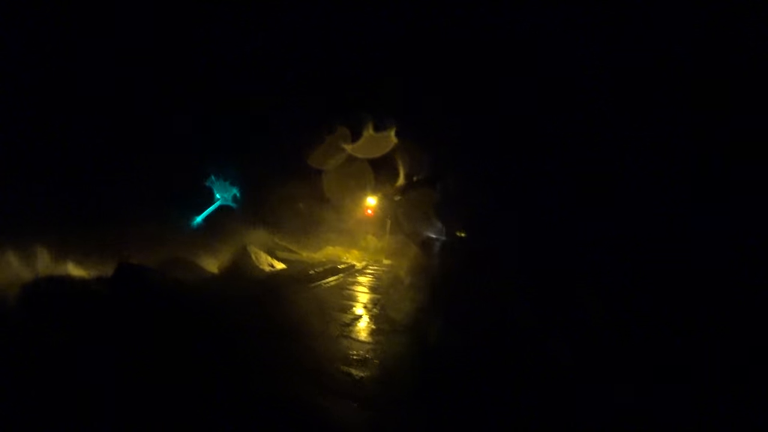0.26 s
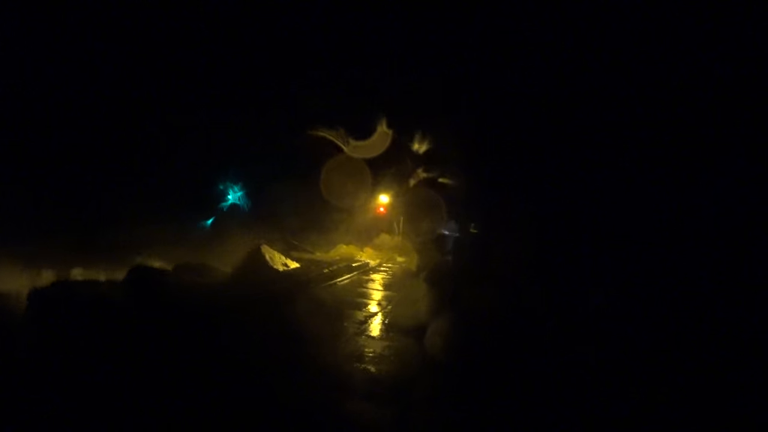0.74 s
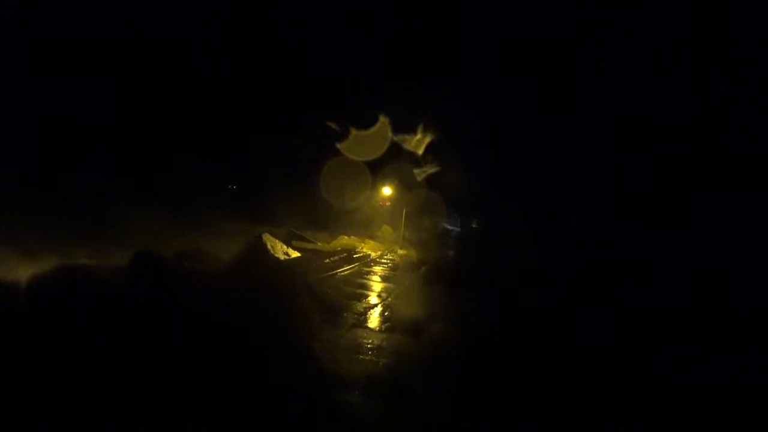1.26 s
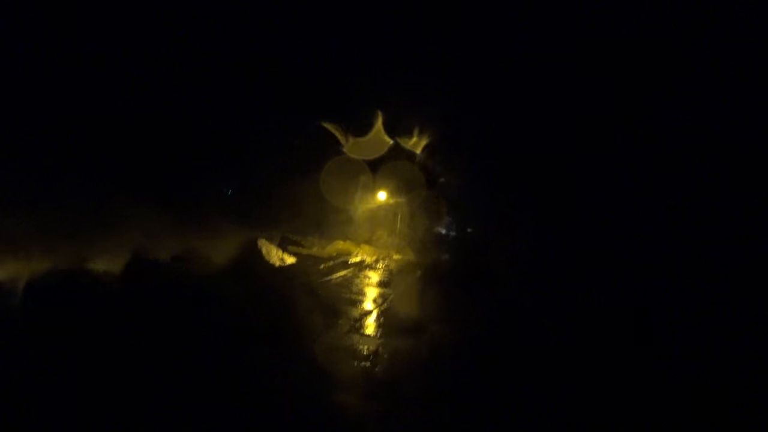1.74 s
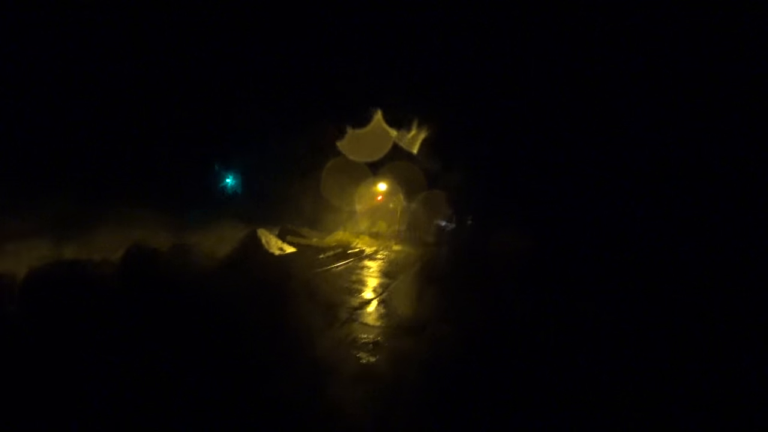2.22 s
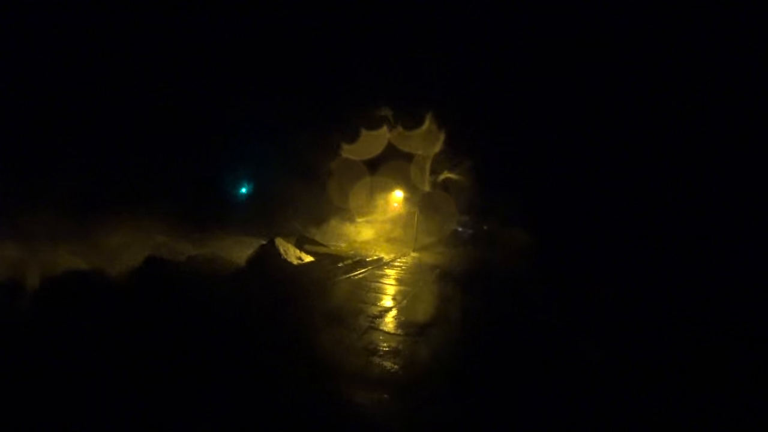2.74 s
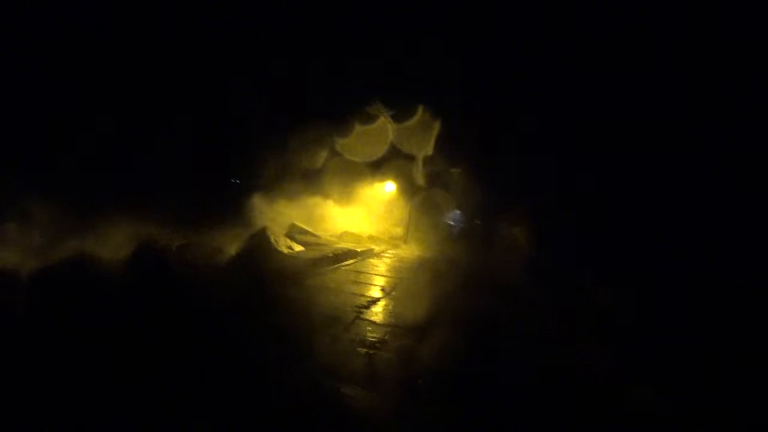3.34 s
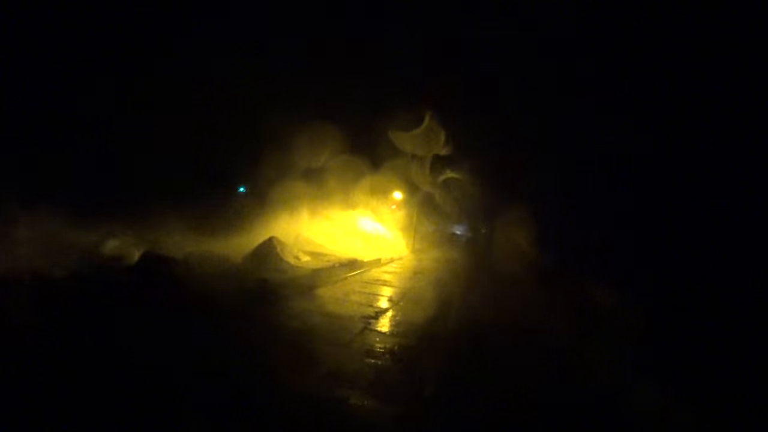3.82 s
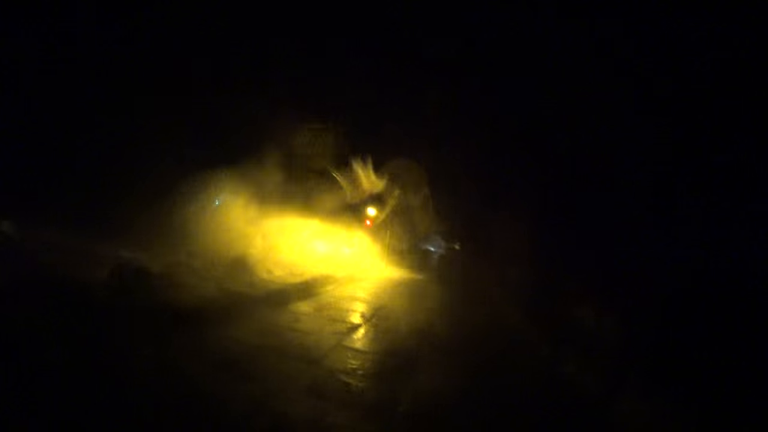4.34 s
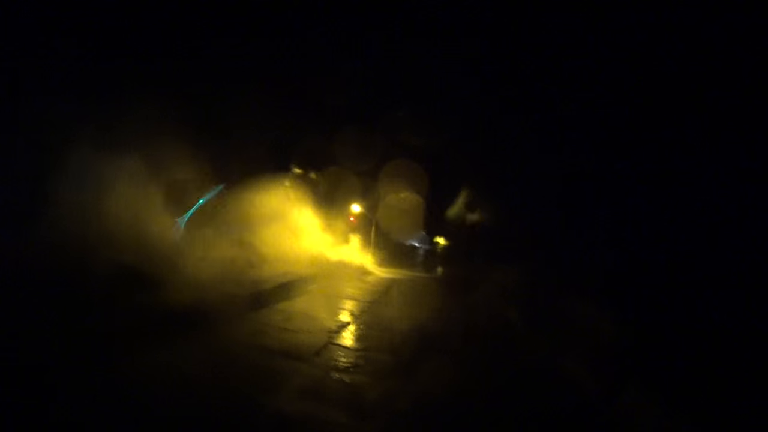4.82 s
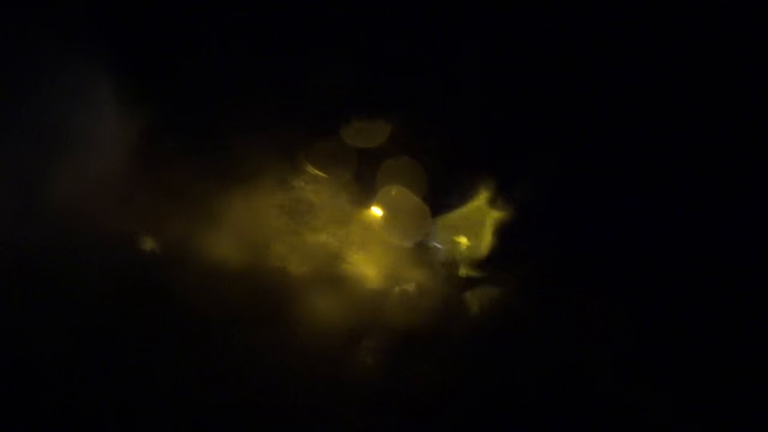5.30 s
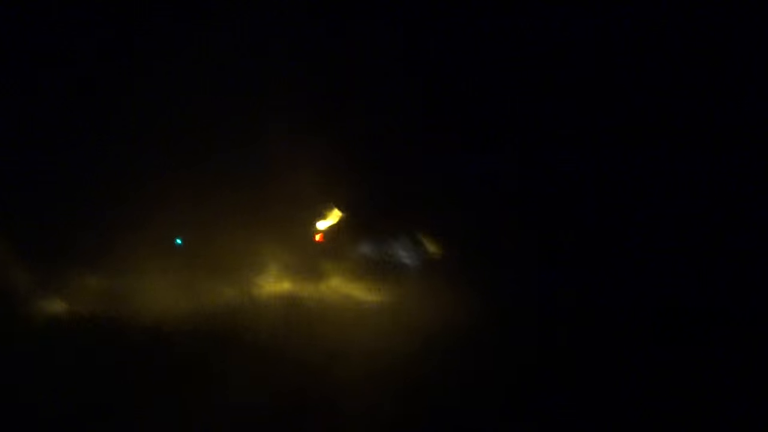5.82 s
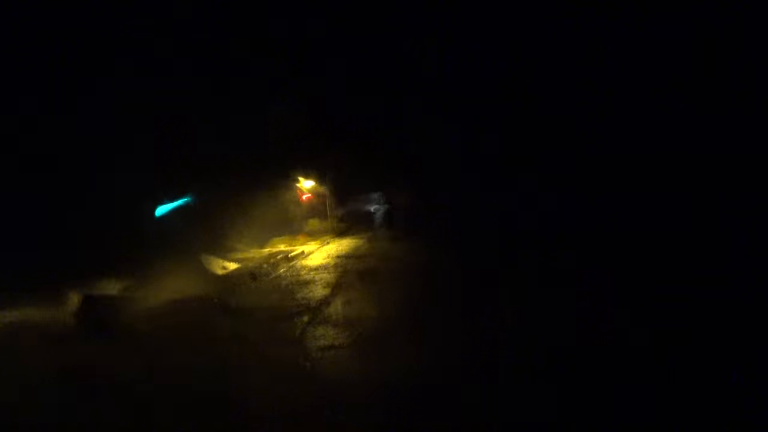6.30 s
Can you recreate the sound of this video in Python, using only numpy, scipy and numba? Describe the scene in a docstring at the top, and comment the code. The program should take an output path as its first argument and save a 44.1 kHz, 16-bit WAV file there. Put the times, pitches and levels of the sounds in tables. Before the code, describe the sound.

Very close, rough stereo storm sound: low wind rumble in uneven gusts, small hard taps of rain and bright ticks on the microphone body. After a few seconds a wave crashes on nearby rocks as a broad hiss, bringing mist patter and wet slaps. Water stuck in the microphone opening gurgles and pops ever louder, briefly pushing everything else down, then thins to scattered spits and drops.

```python
"""The roar of a gale on a harbour pier comes first: shaped noise, buffeting a wet handheld microphone.
An edge tone whistles at its port, and water lodged there sputters as damped rings and a spitting rasp.
Rain and spray ring the case and the mesh in short knocks and ticks; heavier splashes slap the port.
Behind them a wave bursts on the rocks as banded hiss, and fine mist drifts over as haze and patter.
A limiter ducks the whole mix for a moment around its hardest peaks."""
import sys
import numpy as np
from scipy import signal
from scipy.fft import rfft, irfft
from scipy.io import wavfile
from scipy.ndimage import uniform_filter1d, minimum_filter1d
from numba import njit

SR = 44100
rng = np.random.default_rng(int(sys.argv[2]) if len(sys.argv) > 2 else 0)


def inscribe(sig):
    """Save sig as 16-bit PCM at rate SR to the path in sys.argv[1].

    A 1-D sig is mono; a 2-D sig holds one channel per row.
    Samples are clipped to [-1, 1] before scaling.
    """
    pcm = np.round(np.clip(np.atleast_2d(sig).T, -1, 1) * 32767)
    wavfile.write(sys.argv[1], SR, pcm.astype(np.int16))


N = 288855

# Levels in the tables are taken before each source's own trim.
# changing level of the gale under the gusts: t/s, level/dB
GALE = [(0, -31.5), (.42, -32), (.65, -37), (1.3, -36), (1.5, -34), (1.85, -31), (2.3, -30.5), (2.85, -31),
        (3.3, -37.5), (3.6, -29), (3.9, -38), (4.1, -34.5), (4.45, -38.5), (4.9, -39), (5.3, -33.5),
        (5.55, -32.5), (5.75, -47), (6.55, -38.5)]
# gusts striking the microphone: start t/s, length/s, level/dB
GUSTS = [(0.0, 0.36, -32), (.18, 0.045, -26), (.515, 0.037, -33), (1.135, 0.065, -33.5),
         (1.28, 0.032, -34.5), (1.72, 0.027, -34.5), (1.905, .2, -28), (2.175, 0.045, -31),
         (2.345, 0.038, -28), (2.435, 0.079, -26.5), (2.56, 0.079, -27.5), (2.77, 0.12, -32),
         (2.95, 0.21, -35.5), (3.49, 0.21, -29), (3.755, 0.093, -26.5), (4.15, 0.086, -30.5),
         (4.555, 0.044, -36.5), (4.745, 0.034, -33), (4.965, 0.018, -36), (5.225, 0.043, -32),
         (5.37, 0.066, -31), (6.0, 0.053, -35), (6.175, 0.02, -34), (6.34, 0.11, -41)]
# gusts that cut across the rim of the port, whistling and rasping: start t/s, length/s, level/dB
CROSSWINDS = [(0.0, .03, -24.5), (.05, 0.12, -30.5), (1.91, 0.21, -33), (2.78, 0.054, -38)]
# spectrum of the roar: f/Hz, density level/dB per Hz
WIND_COLOUR = [(15, -43), (25, -12), (107, 0.5), (145, -4.5), (206, 0), (332, -1), (370, -1.5), (791, -7.5),
               (1070, -4.5), (1360, 2), (1520, -5.5), (1770, -4), (2290, -16.5), (2670, -25), (3040, -22.5),
               (4500, -26), (5850, -32.5), (9900, -120)]
# turbulence that differs between the two ports: f/Hz, side minus mid level/dB
WIND_SIDE = [(60, -82), (200, -42.5), (380, -16), (650, 0.5), (950, -9.5), (1290, -17), (1800, -3),
             (2400, 12.5), (4400, 0)]
# the wind's lean: f/Hz, left minus right level/dB
WIND_LEAN = [(400, 0), (800, .7), (1300, 2.4), (1900, 2.6), (2800, -3)]
# resonances of the wet port: f/Hz, width/Hz, level/dB, phase between the ports/rad
PORT = [(1670, 214, -1, 0.48), (1386, 125, -14.5, 0.5), (980, 200, -38.5, -0.5), (2804, 720, -11.5, 5.5),
        (3623, 240, -15, 4.5)]
# the long gust blows the port nearly dry until the wave's spray refills it: t/s, wetness/0-1
WETNESS = [(0, .6), (1.3, .9), (1.9, .5), (2.2, .15), (3.3, .15), (3.55, 1), (6.55, 1)]
# bursts of air through the water in the port: start t/s, length/s, level/dB
BURSTS = [(.18, 0.029, -23.5), (.92, 0.044, -28), (.95, .015, -31), (.995, 0.055, -26.5),
          (1.14, 0.023, -27), (2.44, 0.057, -29), (2.605, 0.071, -25.5), (2.69, 0.055, -31.5),
          (2.77, 0.093, -30), (3.57, 0.22, -27.5), (3.74, .07, -35), (3.815, .015, -16.5),
          (4.19, 0.066, -28), (4.355, 0.086, -26), (4.488, 0.024, -25.5), (4.758, 0.023, -20.5),
          (4.965, 0.018, -26.5), (5.505, 0.02, -27), (5.538, 0.13, -12.5), (5.665, 0.056, -6.5),
          (5.799, 0.024, -15.5), (5.852, 0.055, -24), (5.915, .033, -19), (5.972, .12, -21.5),
          (6.0, 0.047, -14.5), (6.125, 0.036, -19.5), (6.177, 0.031, -14), (6.338, 0.08, -26)]
# single loud pops of that water: t/s, peak level/dB, main ring f/Hz
POPS = [(0.08, -12, 1530), (0.088, -10, 1690), (.19, -10, 1660), (0.2147, -10, 1740), (.591, -16, 1830),
        (0.9245, -8.5, 1700), (1.014, -9.5, 1650), (1.9158, -9, 1690), (3.5335, -17, 1640),
        (3.638, -7, 1670), (3.6644, -12, 1750), (3.7088, -5, 1720), (3.749, -2.5, 1670),
        (3.7807, -12, 1620), (3.8177, -9, 1540), (3.9318, -10.5, 1730), (4.0917, -13, 1850),
        (4.118, -12.5, 1640), (4.214, -14, 1590), (4.278, -14, 1730), (4.285, -3, 1690),
        (4.3455, -16, 1700), (4.3593, -9, 1730), (4.4, -9, 1670), (4.4892, -1, 1630), (4.4936, 3, 1770),
        (4.52, -9.5, 1660), (4.5523, -10, 1660), (4.6861, -10.5, 1620), (4.7604, -9.5, 1910),
        (5.03, -11.5, 1610), (5.0601, 7, 1750), (5.1818, -13.5, 2100), (5.296, 2, 1700),
        (5.4824, 5.5, 1700), (5.505, -7.5, 1360), (5.511, 1, 1730), (5.536, 2.5, 1700), (5.541, 0, 1770),
        (5.5526, -1, 1730), (5.5898, 5.5, 1770), (5.5986, 2.5, 1780), (5.6372, 11.5, 1690),
        (5.6482, 8, 1720), (5.6743, 9.5, 1630), (5.697, 6, 1660), (5.721, -0.5, 1760), (5.73, 10, 1660),
        (5.8076, -4, 1650), (5.8503, -2, 1780), (5.8777, -6, 1600), (5.917, -5, 1680), (5.9284, -1, 1670),
        (5.9442, 3, 1660), (5.974, 6, 1700), (6.0257, 4.5, 1700), (6.0893, -17, 1700), (6.1277, -5, 1650),
        (6.1633, -8, 1690), (6.1765, 0, 1670), (6.1874, -6, 1470), (6.193, -1, 1300), (6.2049, 7.5, 1540),
        (6.337, -8, 1640)]
# hard drops tapping the case: t/s, peak level/dB, main ring f/Hz, side/+1 left, -1 right
DROPS = [(.1175, -0.5, 5200, 1), (.2692, -10.5, 4350, -1), (.3435, -12.5, 5030, 1), (.8048, 5, 4170, -1),
         (.9008, 3.5, 5230, 1), (1.087, 4, 4400, -1), (1.1823, 11.5, 4550, -1), (1.2132, -10, 5100, 1),
         (1.3062, 9, 3500, -1), (1.3382, -6.5, 5240, 1), (1.3664, 10, 5400, 1), (1.54, 2.5, 5020, 1),
         (1.6734, -11.5, 4960, 1), (1.7515, 9.5, 5230, 1), (1.8175, 1, 4830, 1), (1.8531, 7.5, 5570, 1),
         (1.9295, -14, 4530, 1), (2.4101, -9, 4930, 1), (2.5908, -1, 4650, 1), (2.6501, 4.5, 4070, -1),
         (2.9023, 4, 4770, 1), (2.9616, -14, 4730, 1), (2.9973, -13.5, 5100, 1), (3.2485, 0, 4940, 1),
         (3.2589, 1.5, 5040, 1), (3.4972, -6.5, 5430, 1), (3.64, -1.5, 3930, -1), (3.6753, 8, 5100, 1),
         (3.7786, -8, 3640, 1), (3.8334, 5, 3980, -1), (3.8429, 10, 3660, 1), (3.8839, 5, 4970, -1),
         (3.899, 5, 5000, 1), (3.9302, -5, 4440, -1), (3.949, -15, 4900, 1), (4.0497, -12.5, 4100, -1),
         (4.0915, -4.5, 3780, 1), (4.0983, 1, 5100, 1), (4.1821, -11.5, 4970, -1), (4.2327, 5.5, 4280, -1),
         (4.3933, -11, 4170, -1), (4.4223, 4, 5030, 1), (4.4402, 3, 4800, 1), (4.4704, 7, 5320, 1),
         (4.5115, -3, 4230, -1), (4.5246, -6, 4450, -1), (4.6161, -8, 4700, 1), (4.6944, 2, 5670, 1),
         (4.7943, -1, 3700, -1), (4.8498, -3, 4800, 1), (4.8913, 6.5, 4340, -1), (4.985, -13, 3910, -1),
         (5.039, -2, 3960, -1), (5.0639, 0, 5160, 1), (5.4819, 7, 5600, 1), (5.6554, 2.5, 5370, 1),
         (5.7589, -5, 5240, -1), (5.7754, -9, 5000, -1), (5.7925, -8.5, 4940, -1), (5.8181, -2.5, 4660, 1),
         (5.843, -13, 5200, 1), (5.881, -2, 4400, 1), (6.0539, 2, 4860, -1), (6.096, -2, 4940, 1),
         (6.1153, 9, 4330, -1), (6.1505, -6, 3850, 1), (6.4483, 10.5, 4340, 1), (6.4662, 2, 4050, -1)]
# ticks on the mesh, from droplets and from the mesh ring of soft drops: t/s, peak level/dB
TICKS = [(0.2032, 3.5), (0.2401, -9), (.3273, -16), (.3338, -11), (0.4894, -12), (0.6773, 0.5),
         (.7094, -12), (0.7237, -13), (1.0013, -13), (1.1208, -11), (1.156, -12), (1.2132, -9),
         (1.347, -15), (1.5493, -7), (1.574, -14), (1.91, -18), (1.9295, -24), (2.4101, -17), (2.4276, -24),
         (2.5265, -16), (2.6176, -18), (2.6357, -16), (2.6468, -19), (2.9973, -22), (3.1517, -15),
         (3.302, -13), (3.3667, -18), (3.3821, -12.5), (3.4869, -12), (3.5385, -13), (3.5918, -13),
         (3.6726, 1), (3.824, -10), (3.949, -20), (3.9843, -8), (3.9994, -12), (4.0451, -10), (4.1497, -10),
         (4.2222, -17), (4.273, -6), (4.2876, -9), (4.3456, -12), (4.4144, -12), (4.6944, 5), (4.8014, 5),
         (4.9614, 4.5), (5.004, -10), (5.26, -3), (5.6213, -2), (5.6469, 2.5), (5.8181, -1), (5.993, -12),
         (6.0144, -8), (6.064, -9), (6.3096, -10), (6.394, -13)]
# spray landing squarely on a port: t/s, peak level/dB
SPLASHES = [(3.844, 8), (4.309, 2.5), (5.656, -0.5), (5.697, 4.5), (5.8183, -2), (6.0451, -8.5),
            (6.098, -11), (6.1565, -4), (6.4485, 1)]
# airborne spray and surf: t/s, surf hiss level/dB, fine mist level/dB
SPRAY = [(0, -53, -55), (.8, -48, -54.5), (1.55, -49.5, -53.5), (2.05, -49.5, -52.5), (2.7, -41.5, -55.5),
         (3.35, -43.5, -50), (3.75, -37, -44), (3.89, -50, -52), (4.0, -41, -47.5), (4.3, -37.5, -44),
         (4.85, -38.5, -45.5), (5.35, -33.5, -38.5), (5.62, -31.5, -40.5), (5.75, -41.5, -56.5),
         (6.05, -30.5, -42.5), (6.27, -46, -54), (6.4, -37.5, -46), (6.55, -43.5, -53.5)]
# upper edge of the hiss, sliding as the microphone turns: t/s, f/Hz
SURF_EDGE = [(0, 6100), (1.8, 6200), (4.9, 5350), (5.3, 7260), (5.6, 6860), (5.9, 5070), (6.55, 4700)]
# spectrum of the surf: f/Hz, density level/dB per Hz
SURF_COLOUR = [(1500, 11), (2800, 8), (4200, 3.5), (5900, 6.5), (7000, -1), (10000, -17), (15000, -17)]
# spectrum of the mist: f/Hz, density level/dB per Hz
MIST_COLOUR = [(6500, -23), (8500, -0.5), (10300, -5.5), (12000, 1.5), (14300, -3), (15000, -4),
               (16000, -3.5)]

GUST_ATTACK_S, GUST_RELEASE_S = 0.024, 0.04
CROSSWIND_ATTACK_S, CROSSWIND_RELEASE_S = 0.02, 0.12
BURST_ATTACK_S, BURST_RELEASE_S = 0.0099, 0.018
RASP_DB, CROSSWIND_RASP_DB = -16, -7  # against the untrimmed gust level; against the crosswind level
SIMMER_DB = -2.5  # crackle of the wet port between bursts, against the untrimmed gust level
GUST_CARRY = 0.27  # dB more spray for each dB that a gust rises above the gale
DROP_PHASE_RAD = 1.81  # lead of the port nearer to the drop
TOP_HZ = 15950  # final low-pass edge
TIME = np.arange(N) / SR
FREQ = np.maximum(np.fft.rfftfreq(N, 1 / SR), 1)
LEFT_RIGHT = np.array([[1], [-1]])


def undb(db):
    """Decibels to gain."""
    return 10 ** (np.asarray(db) / 20)


def unit(x):
    """Scale to rms 1."""
    return x / np.sqrt(np.mean(x ** 2))


def curve(table, axis=1):
    """One column of a time table at every sample."""
    rows = np.array(table)
    return np.interp(TIME, rows[:, 0], rows[:, axis])


def swells(rows, attack_s, release_s):
    """Gain of overlapping (start, length, dB) events, each with an attack, a hold and a release."""
    power = 0
    for s, length, db in rows:
        corners = [s - attack_s, s, s + length, s + length + release_s]
        envelope = np.interp(TIME, corners, [0, undb(db), undb(db), 0])
        power = power + envelope ** 2
    return np.sqrt(power)


def response(points):
    """Gain at every frequency from (Hz, dB) points."""
    hz, db = np.transpose(points)
    return undb(np.interp(np.log(FREQ), np.log(np.maximum(hz, 1)), db))


def noise(gain):
    """Noise with the given gain at each frequency."""
    return irfft(rfft(rng.standard_normal(N)) * gain, N)


def walk(rate):
    """Smooth random drift of rms 1 that changes about rate times a second."""
    return unit(noise(1 / (1 + (FREQ / rate) ** 4)))


def stereo_noise(colour, side):
    """Coloured noise with a share that is opposite in the two channels."""
    return unit(noise(colour) + LEFT_RIGHT * noise(colour * side))


def ring(hz, width_hz, phase, rise_s=.0001, order=1):
    """A short damped resonance, softer in onset with higher order; the left port leads the right by phase."""
    t = TIME[:1024]
    decay = np.exp(-np.pi * width_hz * t) * (1 - np.exp(-t / rise_s)) ** order
    return decay / decay.max() * np.sin(2 * np.pi * hz * t + LEFT_RIGHT * phase / 2)


def add(out, s, sound):
    """Mix a short sound in at time s."""
    i = int(np.clip(s * SR, 0, N - 1))
    out[:, i:i + sound.shape[1]] += sound[:, :N - i]


def shower(per_s, spread_db, sound):
    """Random impacts of uneven size and either polarity, each ringing with the same sound."""
    hits = (rng.random(N) < per_s / SR) * rng.choice([-1, 1], N)
    sizes = undb(spread_db * np.clip(rng.standard_normal(N), -2, 2))
    return signal.oaconvolve((hits * sizes)[None], sound, axes=1)[:, :N]


def wind(gust_db, crosswind, level_db=4, eddy_db=1.75, flutter_db=1.4):
    """Eddies buffet the ports with a roar; the finest add a rasp above it, most of all in a crosswind."""
    roar = stereo_noise(response(WIND_COLOUR), response(WIND_SIDE))
    roar = irfft(rfft(roar) * response(WIND_LEAN) ** (LEFT_RIGHT / 2), N)
    buffet_db = eddy_db * walk(37.0) + flutter_db * walk(170)
    fine_colour = response([(900, -40), (2000, 3), (2700, 13.5), (4000, -10), (7000, -17.5), (12000, -47)])
    fine = stereo_noise(fine_colour, 1.0)
    rasp = np.hypot(undb(gust_db + RASP_DB), crosswind * undb(CROSSWIND_RASP_DB))
    return (roar * undb(gust_db + level_db) + fine * rasp) * undb(buffet_db)


def whistle(gust_db, crosswind, hz=1792, width_hz=30, side=0.46, faint_db=-14):
    """A narrow, unsteady edge tone at the port, faint until the wind cuts across the rim."""
    tone = stereo_noise(1 / (1 + ((FREQ - hz) / width_hz) ** 2), side)
    return tone * (crosswind + undb(gust_db + faint_db))


def port_ring(stretch):
    """The wet port's modes, all shifted by the amount of water in it."""
    return sum(undb(db) * ring(hz * stretch, width, phase, rise_s=0.00059) for hz, width, db, phase in PORT)


def sputter(gust_db, level_db=-2, pop_db=-1, spit_db=-12):
    """Air breaks through the water in the port: a dense crackle, single loud pops and a spitting rasp."""
    crackle = sum(shower(150, 4.9, port_ring(stretch)) for stretch in (.93, 1, 1.06))
    # dry wind alone does not make the port crackle
    simmer = np.sqrt(curve(WETNESS)) * undb(gust_db + SIMMER_DB)
    airflow = np.hypot(simmer, swells(BURSTS, BURST_ATTACK_S, BURST_RELEASE_S))
    out = unit(crackle * undb(1.14 * walk(58))) * airflow * undb(level_db)
    # the crackle tears the film into hissing droplets, so the spit follows its envelope
    envelope = np.sqrt(uniform_filter1d(np.mean(out ** 2, axis=0), size=90) + 1e-12)
    spit_colour = response([(700, -33), (2000, 11.0), (3000, 6), (3800, 4), (5200, 1.5), (7000, -7), (16000, -4.5)])
    spit = stereo_noise(spit_colour, 0.61)
    tearing_db = 4 * walk(250)
    out = out + spit * envelope * undb(spit_db + tearing_db)
    for s, db, hz in POPS:
        add(out, s, undb(db + pop_db) * port_ring(hz / PORT[0][0]))
    # the wet port lies a little to the left
    return out * undb(LEFT_RIGHT * .7)


def case_ring(hz, phase, chance, second_db=-10, tail_db=-20, overtone_db=-18):
    """A drop's knock on the case: main mode, a neighbour of random pitch, a faint tail and an overtone."""
    main = ring(hz, 2050, phase, rise_s=0.00038, order=2)
    second = ring(hz * (1.12 + .14 * chance[0]), 1000, phase, rise_s=0.00076, order=2)
    tail = ring(4000 * (1 + 0.045 * chance[1]), 400, phase, rise_s=0.00069, order=2)
    overtone = ring(9870, 1800, phase / 2, rise_s=.0001, order=2)
    knock = main + undb(second_db) * second
    return knock + undb(tail_db + 1.6 * chance[2]) * tail + undb(overtone_db) * overtone


def mesh_ring(stretch, case_db=-19, lower_db=-3):
    """The bright, very short ring of the mesh, with a little of the case."""
    mesh = ring(13800 * stretch, 1700, .5, rise_s=.0002, order=2)
    lower = ring(12200 * stretch, 1400, -.6, rise_s=.00025, order=2)
    case = ring(4600 * stretch, 1400, 1.0, rise_s=0.00068, order=2)
    # the lower mode swings against the upper one, which fills the band between them
    return mesh - undb(lower_db) * lower + undb(case_db) * case


def rain(drop_db=0, tick_db=-3.0, mesh_db=-15, mesh_growth=0.83, crack_db=-12):
    """Single knocks on the case and ticks on the mesh; a harder drop adds more knock than mesh ring."""
    out = np.zeros((2, N))
    for (s, db, hz, side), chance in zip(DROPS, rng.standard_normal((len(DROPS), 4))):
        mesh = mesh_ring(1.025 + .02 * chance[3])
        knock = case_ring(hz, np.sign(side) * DROP_PHASE_RAD, chance)
        add(out, s, undb(db + drop_db) * knock + undb(mesh_db + mesh_growth * db) * mesh)
    for (s, db), chance in zip(TICKS, rng.standard_normal((len(TICKS), 3))):
        mesh = mesh_ring(1.025 + .02 * chance[0])
        crack = undb(crack_db + 4 * chance[1]) * ring(9500, 4500, .6, rise_s=.00004)
        lean_db = 2.5 * chance[2] * LEFT_RIGHT
        add(out, s, undb(db + tick_db + lean_db) * (mesh + crack))
    return out


def splashes(level_db=0, skew_db=-1, thump_db=-3):
    """Water slaps a port: the left side is pushed and the right one pulled, and the case thumps low."""
    slap = LEFT_RIGHT * (ring(620, 910, 0) * 0.4 + ring(1700, 1100, 0) * 2.66) * undb(skew_db)
    thump = ring(390, 510, 0, rise_s=0.00034) * undb(thump_db)
    # the port leaks, so no pressure stays
    leak = signal.butter(2, 90, "high", fs=SR, output="sos")
    sound = signal.sosfilt(leak, slap + thump)
    out = np.zeros((2, N))
    for s, db in SPLASHES:
        add(out, s, undb(db + level_db) * sound)
    return out


def surf(carried_db, level_db=2, above_edge_db=-11, steepness=14):
    """Broken water hisses on the rocks in bands that churn separately, weaker above a moving edge."""
    edge, colour, out = curve(SURF_EDGE), response(SURF_COLOUR), 0
    borders = np.geomspace(1200, 16000, 19)
    for low, high in zip(borders[:-1], borders[1:]):
        band = colour * (FREQ >= low) * (FREQ < high)
        passed = 1 / (1 + (np.sqrt(low * high) / edge) ** (2 * steepness))
        gain = np.sqrt(passed + undb(above_edge_db) ** 2)
        churn = undb(.9 * walk(15))
        out = out + gain * churn * np.array([noise(band), noise(band)])
    surge_db = .9 * walk(30)
    return unit(out) * undb(curve(SPRAY) + carried_db + level_db + surge_db)


def spray(carried_db, mist_db=0, patter_db=-45.5, patter_growth=0.23, dry_db=-4, case_db=-48):
    """The surf's mist blows over as a smooth haze and a patter of droplets, fainter on a dry mesh."""
    mist = curve(SPRAY, axis=2) + carried_db
    haze_colour = response(MIST_COLOUR) * np.minimum(FREQ / 6500, 1)
    haze = stereo_noise(haze_colour, 0.46) * undb(mist + mist_db + 2 * walk(87))
    thickness_db = mist - np.mean(mist)
    per_s = 50 * undb(thickness_db) ** .9  # droplets in each shower
    flurry = undb(3 * walk(18))
    patter = unit(flurry * sum(shower(per_s, 5.5, mesh_ring(stretch)) for stretch in (1, 1.02, 1.04)))
    patter_gain = undb(patter_db + patter_growth * thickness_db + dry_db * (1 - curve(WETNESS)))
    # fine taps on the case, one shower to each side
    taps = unit(sum(shower(per_s, 6, ring(hz, 1600, phase, rise_s=.0003, order=2))
                    for hz, phase in [(4200, 1.8), (5400, -1.8)]))
    return haze + patter * patter_gain + taps * undb(case_db)


def scene():
    """Gusts ride on the gale; they drive the roar, the whistle and the wet port, and carry more spray."""
    gale_db = curve(GALE)
    gust_gain = np.hypot(undb(gale_db), swells(GUSTS, GUST_ATTACK_S, GUST_RELEASE_S))
    gust_db = 20 * np.log10(gust_gain)
    crosswind = swells(CROSSWINDS, CROSSWIND_ATTACK_S, CROSSWIND_RELEASE_S)
    carried_db = GUST_CARRY * (gust_db - gale_db)
    air = wind(gust_db, crosswind) + whistle(gust_db, crosswind)
    return air + sputter(gust_db) + rain() + splashes() + surf(carried_db) + spray(carried_db)


@njit
def hold(x, keep):
    """Follow peaks at once and let go slowly."""
    y, e = np.empty(len(x)), 0.
    for i in range(len(x)):
        e = max(x[i], e * keep)
        y[i] = e
    return y


def record(dry, ceiling=0.59, release_s=0.017, slow_share=.3, slow_release_s=0.071, top_db=-8):
    """A look-ahead limiter ducks all around the hardest peaks, longer after a big overload; the top is cut."""
    size = np.abs(dry).max(axis=0)
    fast = hold(size, np.exp(-1 / (SR * release_s)))
    slow = hold(size, np.exp(-1 / (SR * slow_release_s)))
    peak = np.maximum(fast, slow_share * slow)
    gain = ceiling / np.maximum(peak, ceiling)
    # centred windows start each duck ahead of its peak and round it off
    gain = uniform_filter1d(minimum_filter1d(gain, size=121), size=101)
    out = irfft(rfft(dry * gain) * response([(14300, 0.053), (16000, top_db)]), N)
    return signal.sosfilt(signal.ellip(8, .2, 70, TOP_HZ, fs=SR, output="sos"), out)


dry = scene()
out = record(dry)
inscribe(out)
```